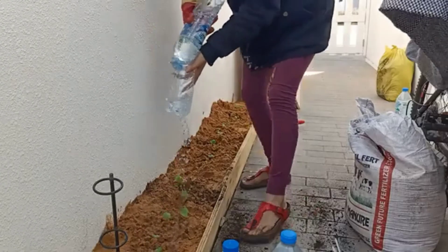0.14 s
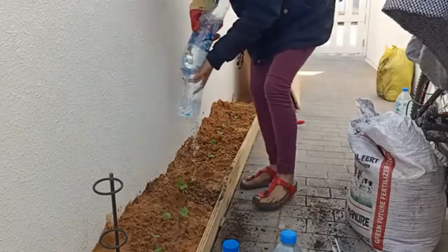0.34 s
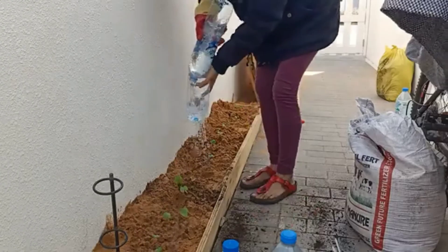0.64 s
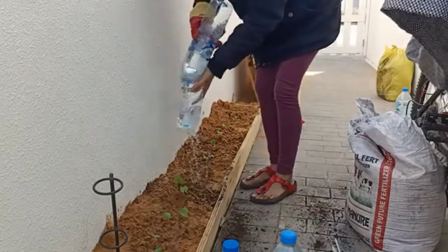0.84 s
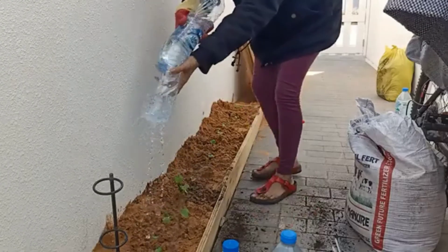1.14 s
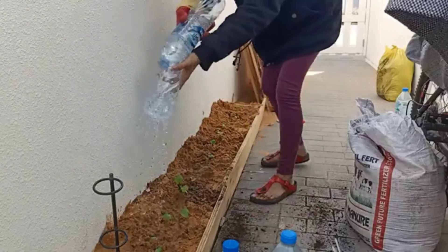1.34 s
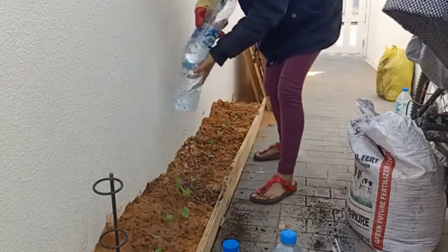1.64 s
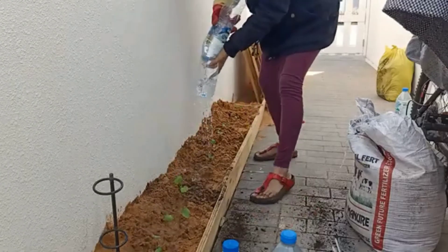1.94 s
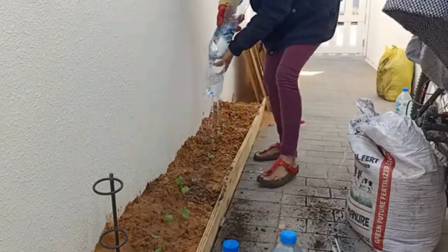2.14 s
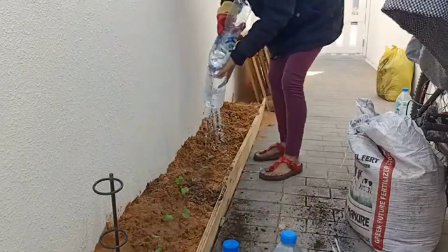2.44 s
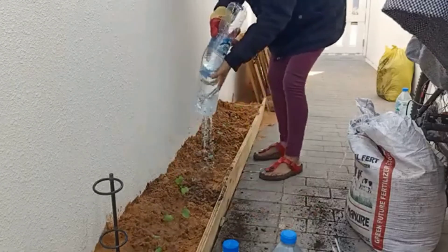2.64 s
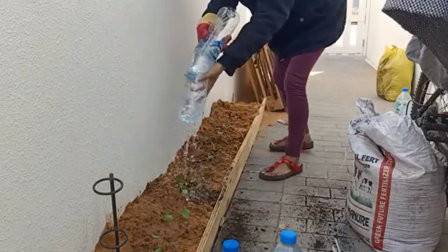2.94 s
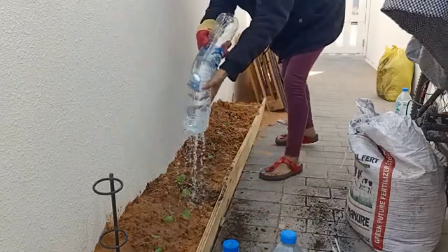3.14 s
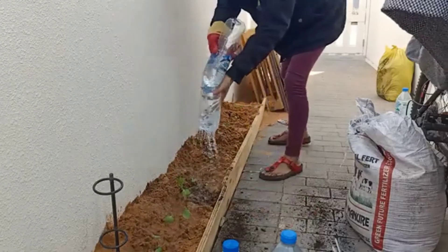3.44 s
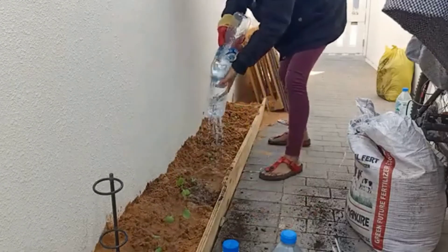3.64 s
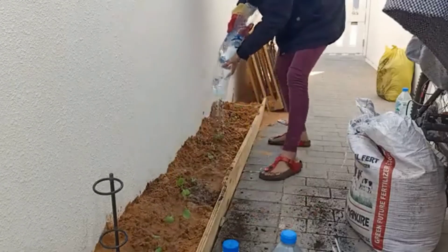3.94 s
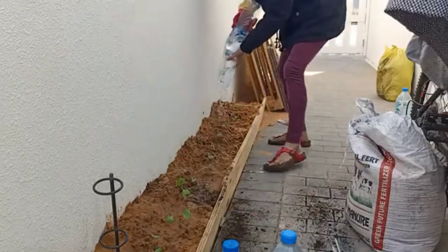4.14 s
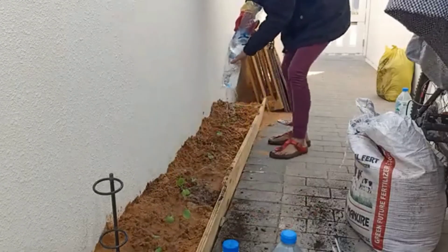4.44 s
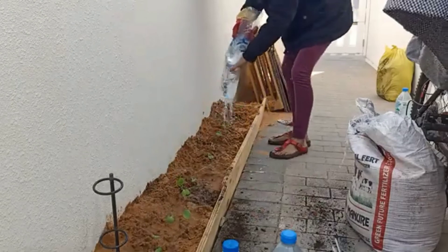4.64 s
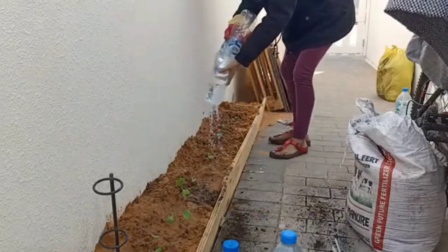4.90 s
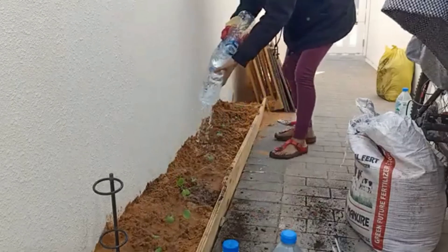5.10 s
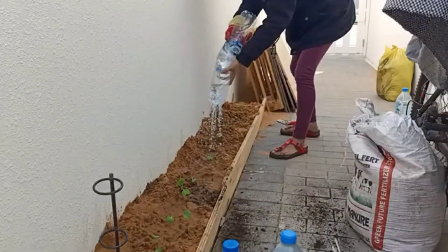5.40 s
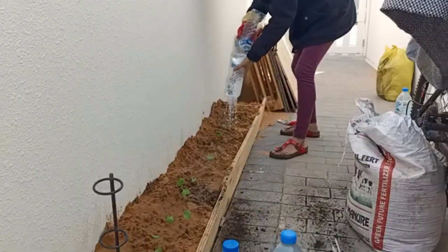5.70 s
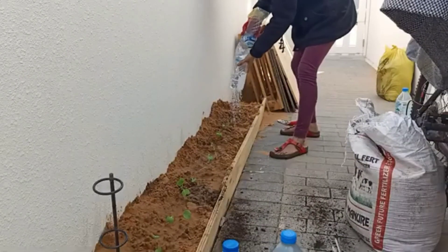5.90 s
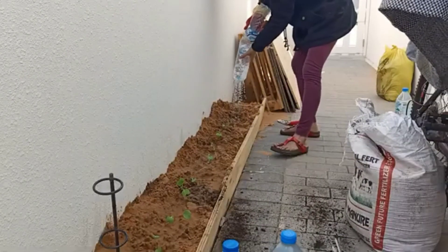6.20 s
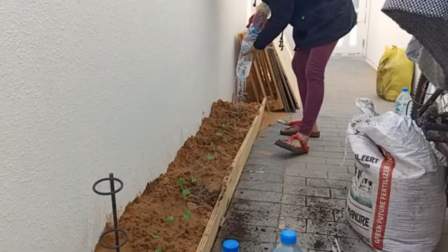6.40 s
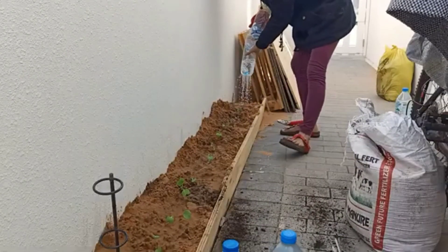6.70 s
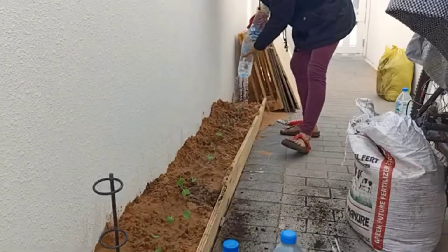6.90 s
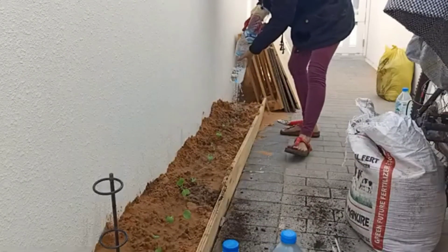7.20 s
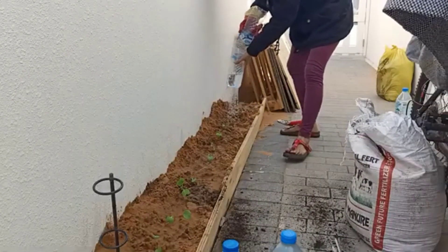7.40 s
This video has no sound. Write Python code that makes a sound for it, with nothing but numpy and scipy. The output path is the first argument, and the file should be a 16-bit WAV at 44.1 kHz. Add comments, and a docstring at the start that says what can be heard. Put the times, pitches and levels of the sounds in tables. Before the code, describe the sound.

In a narrow walled yard, a machine rumbles steadily in the background while, close by, someone sprinkles a sandy bed from a plastic bottle. Short spurts tick on the wet sand throughout, mixed with drips, sloshing, soft glugs and crinkling plastic. The bottle wall pops near the start, then cracks sharply twice later on, the last the loudest, after which everything dips a little. A few faint sandal steps come between.

```python
"""A narrow walled yard, where someone waters a sandy bed from a plastic bottle with holes.
A machine hums in the background and sandals shuffle on the paving. Water sloshes in the bottle,
air glugs back in, and the thin plastic crinkles and snaps three times as it dents.
Each shake or squeeze throws a spurt over a thin trickle: drops tick on wet sand and tinkle in puddles.
A limiter ducks the whole yard after the loud snaps."""
import sys
import numpy as np
from scipy import signal
from scipy.fft import rfft, irfft
from scipy.io import wavfile
from scipy.ndimage import uniform_filter1d

SR = 44100
rng = np.random.default_rng(int(sys.argv[2]) if len(sys.argv) > 2 else 0)


def wrap_up_sound(samples):
    """Save the sound to the file named by the first command line argument, as 16-bit audio."""
    columns = np.atleast_2d(samples).T
    # keep every value between -1 and 1, then stretch to whole-number steps
    tamed = np.clip(columns, -1, 1)
    steps = np.round(tamed * 32767).astype(np.int16)
    wavfile.write(sys.argv[1], SR, steps)


N = 332955
TIME = np.arange(N) / SR

# reverb time of the yard: f/Hz, t60/s
YARD_DECAY = [(200, 0.19), (1000, 0.42), (2200, 0.64), (3200, 0.38), (6000, 0.34), (15000, 0.19)]
# EQ of the machine's rumble: f/Hz, level/dB
RUMBLE_EQ = [(10, -17), (25, 0.5), (38, -7.5), (50, 5.5), (65, -2), (100, 1.5), (140, -0.5), (240, -0.5),
             (330, -4.5), (450, -8.5), (560, -15), (700, -22.5), (1500, -28.5), (5000, -28), (15000, -29.5)]
# how alike the rumble is left and right: f/Hz, correlation/0-1
RUMBLE_LIKENESS = [(20, .6), (45, .74), (75, .8), (140, .87), (300, .93), (640, .6), (1400, .2), (5000, 0)]
# tones of the machine: f/Hz, level/dB, waver/Hz
HUM_TONES = [(75.14, -34, 0.37), (295.5, -43, 6.91)]
# slow swell of the hum: t/s, level/dB
HUM_FADER = [(0, -1.5), (2, -0.5), (4.4, 1), (5.5, -0.5), (6.2, -1), (6.9, 2.5), (7.55, 0)]
# sandals on the paving: t/s, level/dB, decay/s, top f/Hz
FOOTFALLS = [(2.252, -42, 0.02, 1200), (2.314, -36, 0.0083, 1070), (3.7964, -36, 0.018, 1080),
             (5.929, -37.5, 0.02, 1350)]
# pitches of the sloshing water: f/Hz, level/dB
SLOSH_EQ = [(300, 12), (440, 9.5), (560, 1.5), (720, -3), (1050, -2.5), (1550, -11), (2200, -4.5)]
# how hard the water rocks in the swinging bottle: t/s, level/dB
ROCKING_FADER = [(0, -39.5), (.45, -47), (.95, -48.5), (1.15, -42.5), (1.35, -45.5), (1.53, -42.5),
                 (1.7, -48.5), (2.1, -48.5), (2.3, -48), (2.5, -52), (2.85, -47.5), (3.2, -50.5),
                 (3.9, -49.5), (4.4, -46.5), (5.4, -55), (6.2, -54.5), (6.8, -55), (7.55, -60)]
# air bubbles entering the bottle: t/s, level/dB, f/Hz, decay/cycles
GLUGS = [(1.091, -26, 456, 3.5), (1.156, -27, 427, 2), (1.2352, -41, 740, 2), (1.515, -31.5, 573, 6.3),
         (1.572, -32, 528, 3.4), (1.7643, -31.5, 480, 4), (1.847, -31.5, 420, 2.7),
         (1.872, -33.5, 480, 1.5), (2.5845, -38, 400, 2), (2.637, -35, 373, 2.4), (2.6679, -31.5, 510, 1.5),
         (3.12, -33.5, 542, 1.6), (3.796, -27.5, 456, 2.6), (3.821, -30.5, 525, 6.1),
         (3.8904, -28, 479, 5.4), (3.928, -37, 450, 3.3), (4.194, -34, 415, 1.9), (4.662, -42, 960, 1),
         (4.9083, -38, 447, 2.1), (4.932, -42.5, 1060, 1.7), (5.6325, -30, 442, 2.8),
         (6.6356, -34.5, 475, 2)]
# the clearest crinkles of the plastic: t/s, level/dB, f/Hz, width/octaves
CRINKLES = [(0.28, -29.5, 6000, 0.76), (0.391, -31.5, 4040, 1), (0.6928, -37, 4250, 0.53),
            (1.151, -30.5, 6230, 0.45), (1.4334, -37, 6500, 0.37), (1.53, -28.5, 5700, 1.1),
            (1.698, -25.5, 11700, 0.48), (1.7252, -25.5, 5400, 0.97), (2.104, -32.5, 5100, 0.62),
            (2.586, -39.5, 4500, .7), (2.667, -36, 6500, 0.92), (2.972, -36, 6000, 0.88),
            (3.1834, -31, 7100, 0.67), (3.542, -31, 9990, 1.6), (3.5745, -33.5, 3540, 0.53),
            (3.5985, -31.5, 5270, 0.32), (3.6903, -31.5, 3520, 1), (3.803, -33, 6600, 0.99),
            (4.5222, -33.5, 6753, 1.6), (4.855, -31.5, 4500, 1.3), (5.193, -37.5, 5867, 0.37),
            (5.239, -33, 7000, 1.1), (5.2566, -28, 6300, 0.76), (5.2628, -32, 5500, 0.7),
            (5.2907, -26, 6144, 1), (5.494, -35, 8000, 0.36), (5.536, -34, 6000, .8),
            (5.801, -37, 5450, 1.1), (6.139, -31.5, 5700, 0.38), (6.6, -40, 7000, 0.61),
            (6.676, -35.5, 6100, 0.69), (6.948, -40, 4500, 0.56), (7.231, -47, 6500, .6)]
# the bottle wall buckles: t/s, level/dB, decay/s, tilt/(dB per octave), dent f/Hz, dent level/dB
BUCKLES = [(0.6204, -18.5, 0.0036, -6, 1070, -9), (0.653, -28, 0.0036, -8.5, 605, -7),
           (4.2238, -9.5, 0.0062, 1, 820, -11.5), (5.3098, -2, 0.0071, 0.5, 743, -15.5)]
# EQ of a snap's crack: f/Hz, level/dB
CRACK_EQ = [(100, -19.5), (400, -5), (1050, -0.5), (1450, -4), (2000, 1.5), (3200, 2.5), (4500, 4.5),
            (6000, 3), (9500, -6.5), (11500, -5), (16000, -10.5)]
# ringing of the bottle wall: f/Hz, level/dB, t60/s
WALL_MODES = [(860, 0, 0.025), (1400, -21, 0.059), (2193, -1, 0.15), (2440, 18, 0.034), (2930, 18, 0.044),
              (3660, -7, 0.028), (4700, 5, 0.037), (6460, 1, 0.037)]
# spells when drops fall into a puddle: t/s, length/s, level/dB
PUDDLE_SPELLS = [(1.145, 0.59, -46), (2.336, 0.032, -28), (4.43, 0.08, -39.5), (6.466, 0.19, -41.5),
                 (6.88, 0.42, -45)]
# pitches of those drops: f/Hz, level/dB
TINKLE_EQ = [(3000, -41), (4400, 10), (5400, 0), (6500, 1), (8500, 0)]
# single pitched drips and, near 2.9 s, the blips of a short gurgle: t/s, level/dB, f/Hz, decay/cycles
DRIPS_AND_BLIPS = [(1.021, -39.5, 2070, 2.1), (1.055, -43, 3800, 5), (1.184, -29, 6000, 3.1),
                   (1.244, -30.5, 6170, 2.2), (1.329, -33, 6400, 2.2), (1.3654, -31.5, 6800, 3.4),
                   (1.398, -28, 6500, 8.9), (2.85, -45, 1500, 1.5), (2.879, -45, 1890, 1.5),
                   (2.915, -42, 2800, 2), (3.192, -36, 5800, 6), (3.3286, -30.5, 5700, 5),
                   (3.342, -30, 7650, 4.2), (3.379, -37, 7600, 6), (3.8907, -33, 2810, 8.7),
                   (4.083, -35.5, 8700, 7), (4.1088, -34.5, 5640, 3.5), (4.156, -42.5, 2030, 8.7),
                   (4.645, -45.5, 2020, 3), (4.933, -40.5, 2820, 2.8), (5.0989, -34, 3850, 4.8),
                   (6.929, -37, 4800, 2.7), (7.0477, -28.5, 4300, 7), (7.09, -35, 5150, 3.1),
                   (7.106, -33.5, 4400, 6), (7.202, -42.5, 3000, 2.3)]
# the thin trickle under the spurts: t/s, level/dB
TRICKLE_FADER = [(0, -39.5), (.35, -44), (.5, -49.5), (.85, -41), (1, -48), (1.8, -39), (2.2, -55),
                 (2.4, -40), (2.52, -56.5), (2.8, -42.5), (4, -45.5), (4.42, -51), (4.6, -45.5),
                 (5.5, -39.5), (5.9, -45), (6.3, -46), (6.7, -43), (7.55, -44.5)]
# one spurt for each shake or squeeze: t/s, length/s, level/dB, dull patter boost/dB
SPURT_CUES = [(0.0, 0.12, -37, 1), (0.174, 0.11, -30.5, -2), (0.512, 0.23, -34.5, 1.5),
              (0.787, 0.078, -34.5, -1.5), (1.112, 0.25, -35.5, -2.5), (1.397, 0.26, -32.5, -5.5),
              (1.697, 0.078, -37, -11), (1.837, 0.03, -32, 2.5), (1.896, .11, -32.5, -9),
              (2.11, 0.054, -33, -3), (2.238, 0.11, -39, 1), (2.343, 0.037, -25, -3),
              (2.596, 0.15, -40, 2.5), (2.814, 0.13, -37, 1), (2.984, .19, -37, -2), (3.178, .31, -38, -5),
              (3.521, 0.09, -35, -6), (3.64, .33, -39.5, 0), (4.083, .3, -39, 0.5), (4.447, .09, -35, -1.5),
              (4.685, 0.043, -45.5, 7), (4.88, 0.24, -45, -2.5), (5.256, 0.2, -33.5, 4),
              (5.511, 0.1, -38, 3), (5.726, 0.052, -39.5, -8), (6.46, 0.3, -41.5, -6),
              (6.859, .41, -38.5, -8), (7.357, 0.08, -38, -2)]
# pitches of the spray on the sand: f/Hz, level/dB
SPRAY_EQ = [(900, -25), (1700, -26.5), (2300, -5), (3000, -0.5), (3800, -5.5), (4700, -2), (6200, -6),
            (8000, -5.5), (9800, -9), (12000, -5), (15000, -11.5)]

SPURT_ATTACK_S, SPURT_RELEASE_S = 0.013, 0.019  # lands quickly, tails off in stragglers


def amp(db):
    """Decibels to gain."""
    return 10 ** (np.asarray(db) / 20)


def unit_rms(x):
    """Scales to rms 1."""
    return x / np.sqrt(np.mean(x ** 2) + 1e-20)


def unit_hit(x):
    """Scales a one-shot to the energy of 10 ms at rms 1."""
    return x / np.sqrt(np.mean(x ** 2) * x.shape[-1] / (.01 * SR) + 1e-20)


def curve_at(points, hz):
    """Reads a curve on a log-frequency axis."""
    f, value = np.transpose(points)
    return np.interp(np.log(hz + 1), np.log(f), value)


def fader(rows):
    """Gain that rides a level curve."""
    return amp(np.interp(TIME, *np.transpose(rows)))


def gate(start, length, attack, release):
    """Envelope that opens at start, holds until start + length, then dies away."""
    t = TIME - start
    return np.clip(t / attack, 0, 1) * np.exp(-np.maximum(t - length, 0) / release)


def drift(rate_hz):
    """Slow random wobble of rms 1."""
    hz = np.fft.rfftfreq(N, 1 / SR)
    return unit_rms(irfft(rfft(rng.standard_normal(N)) / (1 + (hz / rate_hz) ** 4), N))


def place(mix, s, sound):
    """Lays a stereo one-shot into the mix at s seconds."""
    part = mix[:, round(s * SR):][:, :sound.shape[1]]
    part += sound[:, :part.shape[1]]


def eq(x, db_at):
    """Minimum-phase EQ for a one-shot; db_at gives the gain at each frequency."""
    hz = abs(np.fft.fftfreq(x.shape[-1], 1 / SR))
    log_gain = np.log(amp(db_at(hz)))
    return np.fft.ifft(np.fft.fft(x) * np.exp(np.conj(signal.hilbert(log_gain)))).real


def resonance(x, hz, octaves, skirt_db=22):
    """Band-pass around hz; a larger skirt_db gives steeper sides."""
    return eq(x, lambda f: -skirt_db * np.log10(1 + (np.log2((f + 50) / hz) / octaves) ** 2))


def crackle(decay, samples=4096):
    """A quick, dying run of tiny clicks in stereo, flattened to an even spectrum."""
    t = np.arange(samples) / SR
    grit = rng.standard_normal((2, samples)) * rng.exponential(1, samples) ** .5
    spectrum = rfft(grit * np.exp(-t / decay))
    spectrum /= np.sqrt(uniform_filter1d(abs(spectrum) ** 2, size=45))
    return irfft(spectrum, samples) * (t < t[-1] / 2)


def ping(hz, cycles, glide, samples=4096):
    """A damped tone; glide bends it upward, like a bubble nearing the surface."""
    age = np.arange(samples) / SR * hz / cycles  # in decay times
    envelope = np.exp(-age) * (1 - np.exp(-age * cycles * 2))
    return envelope * np.sin(2 * np.pi * cycles * (age + glide * (age - 1 + np.exp(-age))))


def shower(spectrum, per_s, spread_db, cycles, glide, pitches):
    """A random cloud of small pings at rms 1, each pitch from its own direction."""
    out = np.zeros((2, N))
    for hz in np.geomspace(spectrum[0][0], spectrum[-1][0], pitches):
        sizes = amp(spread_db * np.minimum(rng.exponential(1, N), 4))
        hits = sizes * (rng.random(N) < per_s / pitches / SR) * rng.choice([-1, 1], N)
        drops = signal.oaconvolve(hits, np.diff(ping(hz, cycles, glide, samples=3000)))[:N]
        drops = unit_rms(drops) * amp(curve_at(spectrum, hz)) * np.sqrt(hz)
        out += [drops, np.roll(drops, rng.integers(-14, 12))]
    return unit_rms(out)


def yard(x, near_db, tail_db, near_decay=0.018):
    """Adds early reflections off the ground and a close wall, then a thin tail between the walls."""
    t = np.arange(SR // 2) / SR
    near, late = rng.standard_normal((2, 2, len(t))) * (rng.random((2, 2, len(t))) < .08)
    near *= np.exp(-t / near_decay) * (t > .001)
    hz, frame_s, bands = signal.stft(late * (t > .008), SR, nperseg=256)
    fade = amp(-60 * frame_s / curve_at(YARD_DECAY, hz)[:, None])
    tail = signal.istft(bands * fade, SR, nperseg=256)[1][:, :len(t)]
    echo = sum(amp(db) * part / np.linalg.norm(part, axis=1, keepdims=True)
               for db, part in [(near_db, near), (tail_db, tail)])
    # long waves reach both sides alike
    echo[1] += signal.filtfilt(*signal.butter(2, 700, fs=SR), echo[0] - echo[1])
    return x + signal.oaconvolve(x, echo, axes=1)[:, :N]


def roving_yard(x, turns_per_s, **room):
    """The landing spot moves along the bed: crossfades round three patterns of echoes."""
    share = np.array([np.cos(np.pi * (turns_per_s * TIME + k / 3)) ** 4 for k in range(3)])
    share /= share.sum(0)
    return x + sum(yard(x * send, **room) - x * send for send in np.sqrt(share))


def machine():
    """A distant fan unit, a little to the right: steady rumble with a wavering hum."""
    hz = np.fft.rfftfreq(N, 1 / SR)
    right, other = rfft(rng.standard_normal((2, N)))
    likeness = np.clip(curve_at(RUMBLE_LIKENESS, hz), 0, 1)
    left = likeness * right + np.sqrt(1 - likeness ** 2) * other
    left *= np.exp(-2j * np.pi * hz * .00005)  # arrives later
    rumble = unit_rms(irfft(np.array([left, right]) * amp(curve_at(RUMBLE_EQ, hz)), N))
    hum = sum(amp(db) * np.sqrt(2) * np.sin(2 * np.pi * np.cumsum(f + waver * drift(11.06)) / SR)
              for f, db, waver in HUM_TONES)
    hum *= fader(HUM_FADER) * amp(.8 * drift(2.7))
    return amp(-34) * rumble * amp([[-.6], [.6]]) + hum * amp([[-.3], [.3]])


def sandals():
    """A soft sole meets the paving: a dull, gritty pat."""
    out = np.zeros((2, N))
    for s, db, decay, top_hz in FOOTFALLS:
        def muffle_db(f):
            return -10 * np.log10((1 + (f / top_hz) ** 8) * (1 + (300 / (f + 20)) ** 2)).clip(0, 8)
        pat = eq(crackle(decay, samples=8192), muffle_db)
        place(out, s, amp(db) * unit_hit(pat + .5 * pat[::-1]))  # crossfeed narrows the image
    return yard(out, near_db=-2, tail_db=-6)


def slosh(churn_db=-5.5):
    """Small bubbles in moving water, stirred by the swing of the bottle and briefly by each glug."""
    churn_power = sum((amp(db + churn_db) * gate(s, 0, attack=0.0035, release=0.018)) ** 2
                      for s, db, *_ in GLUGS)
    stir = np.sqrt(fader(ROCKING_FADER) ** 2 + churn_power)
    water = shower(SLOSH_EQ, per_s=600, spread_db=3, cycles=2.5, glide=.05, pitches=24)
    return amp(0.5) * yard(water * stir, near_db=1, tail_db=-26)


def glugs():
    """Air breaks in through the holes with a soft splat; each bubble swells and rings at its pitch."""
    out = np.zeros((2, N))
    swell = 1 - np.exp(-np.arange(4096) / SR / .002)
    for s, db, hz, cycles in GLUGS:
        ring = unit_hit(swell * ping(hz, cycles, glide=0.02))
        splat = unit_hit(resonance(crackle(decay=0.0051), 1.16 * hz, octaves=0.53, skirt_db=20))
        place(out, s, amp(db) * (np.array([np.roll(ring, 2), ring]) + amp(-2.5) * splat))
    return amp(-2) * yard(out, near_db=-5, tail_db=-11, near_decay=0.013) * amp([[-1], [1]])


def crinkles(pour, per_s=7, offset_db=-2.5, spread_db=5, centre_hz=5800, width_octaves=0.75):
    """Squeezed plastic ticks in one broad resonance; random extra ticks follow the level of the flow."""
    out = np.zeros((2, N))
    count = round(per_s * N / SR)
    extras = []
    for at, (loudness, pitch) in zip(rng.integers(0, N, count), rng.standard_normal((count, 2))):
        db = 20 * np.log10(pour[at]) + offset_db + spread_db * loudness
        extras.append((at / SR, db, centre_hz * 2 ** (0.52 * pitch), width_octaves))
    for s, db, hz, octaves in CRINKLES + extras:
        tick = resonance(crackle(decay=0.0022), hz, octaves + 0.027)
        place(out, s, amp(db) * unit_hit(tick))
    return yard(out, near_db=-4.5, tail_db=-12)


def snaps():
    """A dent pops through the thin wall: a dense crack and a brief ring, retuned by each new dent."""
    out, t = np.zeros((2, N)), np.arange(4096) / SR
    attack = 1 - np.exp(-t / .0013)
    for s, db, decay, tilt_db, dent_hz, dent_db in BUCKLES:
        crack = eq(crackle(decay), lambda f: curve_at(CRACK_EQ, f) + tilt_db * np.log2((f + 100) / 3000))
        dent = ping(dent_hz, cycles=1.9, glide=0)
        ring = sum(amp(mode_db + tilt_db * np.log2(hz / 3000) - 60 * t / t60)
                   * np.sin(2 * np.pi * (hz * rng.uniform(0.88, 1.05) * t + rng.random((2, 1))))
                   for hz, mode_db, t60 in WALL_MODES)
        snap = unit_hit(crack) + amp(-12) * unit_hit(ring) + amp(dent_db) * unit_hit(dent)
        place(out, s, amp(db) * unit_hit(snap * attack))
    # pull the low body toward the centre
    low_side = signal.filtfilt(*signal.butter(1, 900, fs=SR), out[0] - out[1])
    out += low_side * np.array([[-.3], [.3]])
    return yard(out, near_db=-5.5, tail_db=-16, near_decay=.014)


def tinkle():
    """Drops that hit standing water trap tiny bubbles, which ring briefly."""
    wet = sum(amp(db) * gate(s, length, SPURT_ATTACK_S, SPURT_RELEASE_S)
              for s, length, db in PUDDLE_SPELLS)
    drops = wet * shower(TINKLE_EQ, per_s=400, spread_db=-0.5, cycles=6.8, glide=0.011, pitches=28)
    return amp(-3.5) * roving_yard(drops, turns_per_s=1.1, near_db=-8, tail_db=-19, near_decay=0.0054)


def drips_and_blips():
    """Each drip or gurgle blip is a crisp, pitched tick with a small rough splash around that pitch."""
    out = np.zeros((2, N))
    for s, db, hz, cycles in DRIPS_AND_BLIPS:
        tick = amp(-2) * unit_hit(ping(hz, cycles, glide=0.0092))
        splash = amp(-3) * unit_hit(resonance(crackle(decay=0.006), hz, octaves=0.4))
        place(out, s, amp(db) * (np.array([np.roll(tick, 2), tick]) + splash))
    return yard(out, near_db=-6, tail_db=-15, near_decay=.004)


def flow():
    """Spurts on top of the trickle: envelopes for the whole pour and for its dull patter."""
    spurt_power = np.array([(amp(db) * gate(s, length, SPURT_ATTACK_S, SPURT_RELEASE_S)) ** 2
                            for s, length, db, _ in SPURT_CUES])
    patter_boost = amp([boost_db for *_, boost_db in SPURT_CUES]) ** 2
    trickle_power = fader(TRICKLE_FADER) ** 2
    pour = np.sqrt(spurt_power.sum(0) + trickle_power)
    patter = np.sqrt(patter_boost @ spurt_power + trickle_power)
    return pour, patter


def clumps(per_s, decay, spread_db):
    """Envelope of rms 1 for water landing in lumps: each starts at once and dies quickly."""
    lumps = amp(spread_db * np.minimum(rng.exponential(1, N), 3)) * (rng.random(N) < per_s / SR)
    return unit_rms(signal.lfilter([1], [1, -np.exp(-1 / (decay * SR))], lumps))


def spray(pour, patter, patter_top_hz=4230):
    """Jets break into lumps of drops that tick on wet sand; a stronger spurt brings more, harder drops."""
    landing = pour * (.6 + .46 * clumps(per_s=80, decay=.005, spread_db=2.5))
    density = landing / landing.mean()
    force = np.sqrt(landing * landing.mean())
    drops = shower(SPRAY_EQ, per_s=2200 * density, spread_db=2, cycles=2.25, glide=0.0024, pitches=40)
    hard = shower(SPRAY_EQ, per_s=170 * density, spread_db=2.5, cycles=1.1, glide=0, pitches=18)
    # some of the finest drops have a brief pitch
    fine = shower(SPRAY_EQ[5:], per_s=260 * density, spread_db=2.5, cycles=5, glide=.01, pitches=20)
    water = (drops + amp(-7) * hard + amp(-6) * fine) * force
    dull = signal.filtfilt(*signal.butter(4, patter_top_hz, fs=SR), water)
    water += dull * (patter / pour - 1)  # the lower band rides the patter envelope
    return amp(-5.5) * roving_yard(water, turns_per_s=1.3, near_db=1.5, tail_db=-11, near_decay=0.013)


def scene():
    """The mix: water, bottle, feet and machine."""
    pour, patter = flow()
    water = spray(pour, patter) + drips_and_blips() + slosh() + tinkle() + glugs()
    return water + snaps() + sandals() + machine() + crinkles(pour)


def record(dry, threshold_db=-12.5, slope=0.64, start_duck_db=3.5, peak_db=-2, top_hz=15300):
    """A limiter starts ducked, ducks again on loud snaps, deeper on the loudest; then clip and low-pass."""
    def held(duck_db, db_per_s):
        """Gain reduction with instant attack and steady release."""
        release = db_per_s * TIME
        return np.maximum(np.maximum.accumulate(duck_db + release) - release, 0)

    power_db = 10 * np.log10(abs(uniform_filter1d((dry ** 2).mean(0), size=176)) + 1e-12)
    wanted_db = slope * (power_db - threshold_db)
    wanted_db[0] = max(wanted_db[0], start_duck_db)
    slow_db = held(wanted_db, db_per_s=2)
    dip_db = signal.lfilter(*signal.butter(1, 12, fs=SR), held(power_db - peak_db, db_per_s=3))
    gain = amp(-uniform_filter1d(slow_db + dip_db, size=64))
    lowpass = signal.firwin(255, top_hz, window=("kaiser", 9), fs=SR)
    return signal.oaconvolve(np.clip(dry * gain, -1, 1), lowpass[None], "same")


dry = scene()
out = record(dry)
wrap_up_sound(out)
```